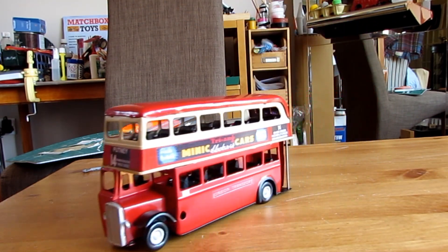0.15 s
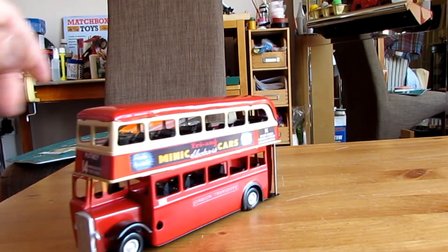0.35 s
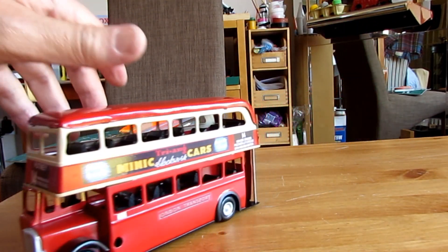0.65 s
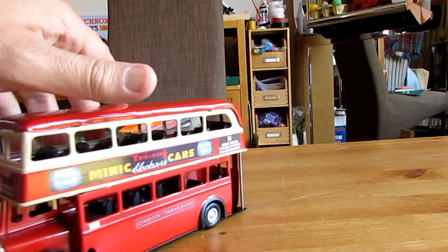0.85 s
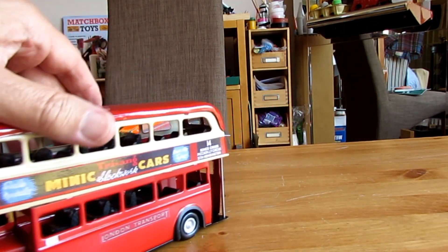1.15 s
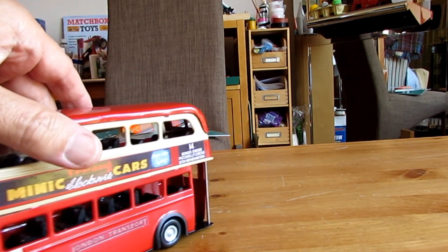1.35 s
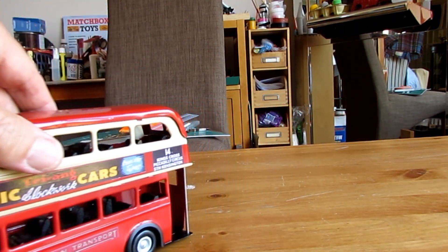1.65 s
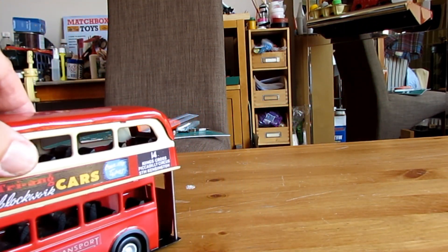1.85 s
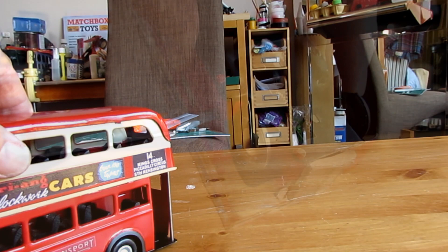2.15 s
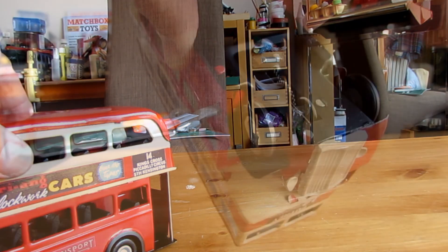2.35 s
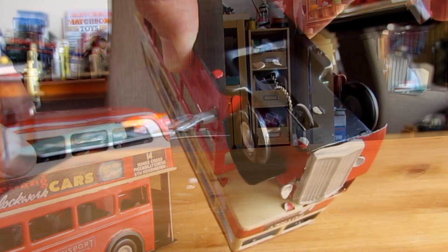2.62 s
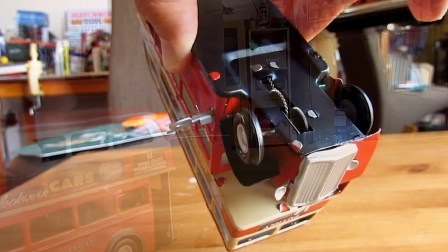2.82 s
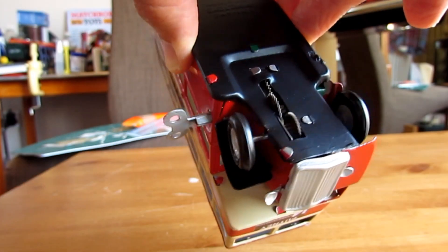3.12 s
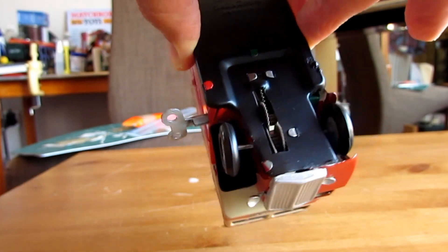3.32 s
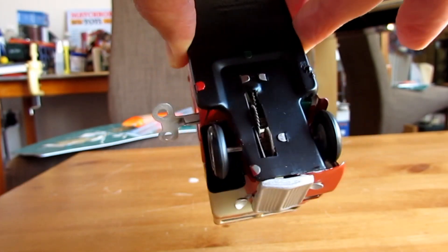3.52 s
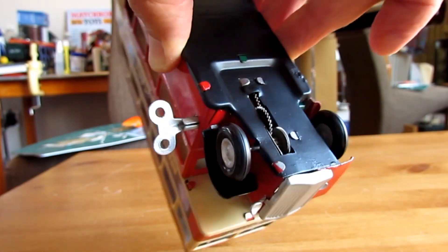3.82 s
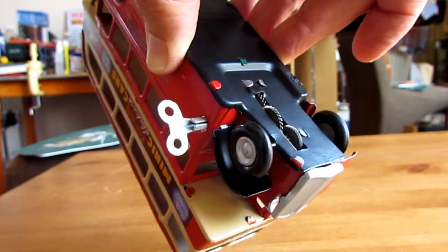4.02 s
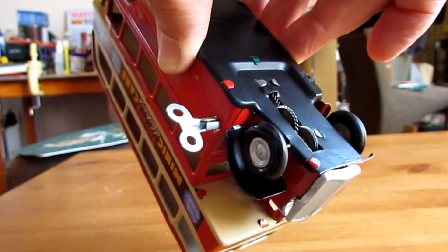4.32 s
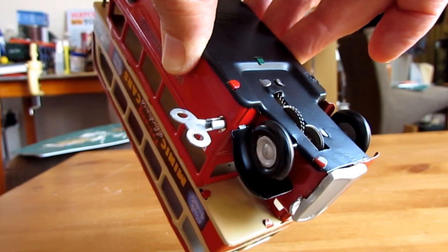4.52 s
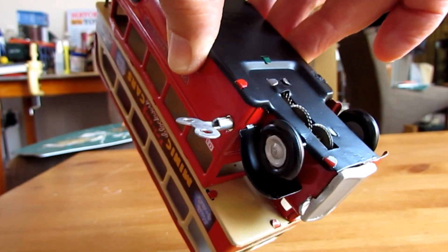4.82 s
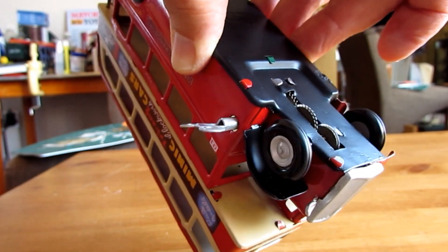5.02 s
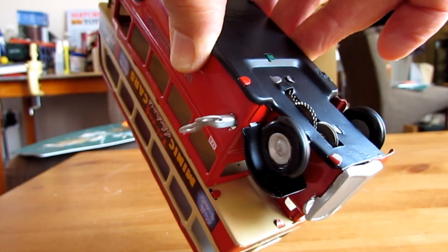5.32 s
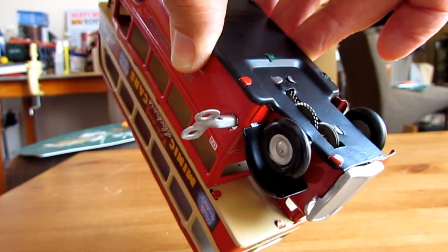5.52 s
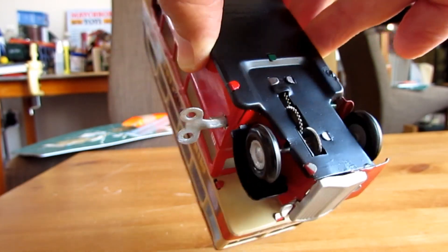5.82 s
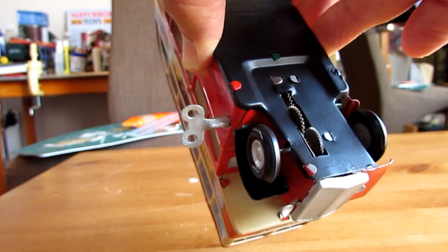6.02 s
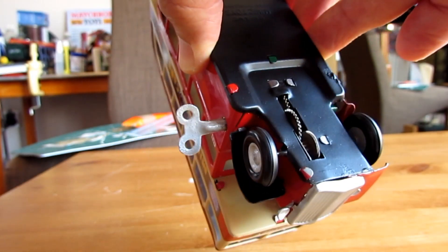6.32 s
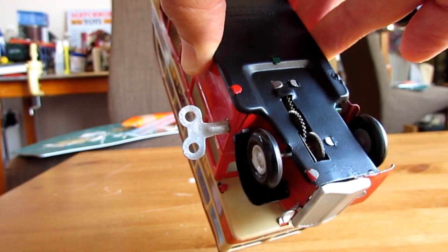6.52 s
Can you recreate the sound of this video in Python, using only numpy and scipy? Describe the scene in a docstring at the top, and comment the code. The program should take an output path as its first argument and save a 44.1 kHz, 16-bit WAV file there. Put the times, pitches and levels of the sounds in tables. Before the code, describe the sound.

Loose tin panels chatter and clink as a toy rolls on wood; after a near-silent gap, a wound spring motor buzzes with gritty ticking gears.

```python
"""Clockwork tin bus

A tin toy bus rolls slowly over a wooden table, its loose panels chattering, until a hand stops it.
Then it is held up close with its wheels in the air: gears and governor ring the tin shell, and slow down unevenly.
Random tiny blows are passed through bodies with many resonances; sines and shaped noise add the drone,
pings, clicks and finger bumps. A low rumble and the faint hush of a room lie behind and fade away."""
import sys
import numpy as np
from scipy import signal
from scipy.fft import rfft, irfft, next_fast_len
from scipy.io import wavfile
from scipy.ndimage import map_coordinates

SR = 44100
rng = np.random.default_rng(int(sys.argv[2]) if len(sys.argv) > 2 else 0)


def pcm_store(signal):
    """Save signal as 16-bit PCM."""
    levels = np.round(np.clip(np.atleast_2d(signal), -1, 1) * 32767)
    wavfile.write(sys.argv[1], SR, levels.astype(np.int16).T)


N = 293706  # length in samples


def amp(db):
    """Turn decibels into gain."""
    return 10 ** (np.asarray(db) / 20)


def unit(x):
    """Scale to an average (rms) level of 1."""
    return x / np.sqrt(np.mean(x ** 2) + 1e-20)


def along(points, hz):
    """Read a curve of (f/Hz, value) points on a logarithmic frequency axis."""
    f, value = np.transpose(points)
    return np.interp(np.log(hz + 1), np.log(f + 1), value)


def curves(rows):
    """Give one value per sample for each column after the time."""
    s, *columns = np.transpose(rows)
    t = np.arange(N) / SR
    return [np.interp(t, s, column) for column in columns]


def wobble(rate):
    """Draw a smooth random curve with `rate` knots a second."""
    knots = rng.standard_normal(int(N * rate / SR) + 4)
    coarse = np.arange(0, N, 64)
    return np.interp(np.arange(N), coarse, map_coordinates(knots, [coarse * rate / SR]))


def filtered(x, response):
    """Weight the frequencies of x by a response."""
    m = next_fast_len(N + SR // 4, real=True)
    spectrum = rfft(x, m) * response(np.fft.rfftfreq(m, 1 / SR))
    return irfft(spectrum, m)[..., :N]


def band(x, lo_hz, hi_hz):
    """Keep x between two soft edges; bands that share an edge add up without a gap."""
    below = lambda f, edge: 1 / (1 + (f / edge) ** 24)
    return filtered(x, lambda f: below(f, hi_hz) - below(f, lo_hz))


def noise(spectrum):
    """Make two unrelated noises of a given colour, each of rms 1."""
    white = rng.standard_normal((2, N))
    return unit(filtered(white, lambda f: amp(along(spectrum, f))))


def stereo(pair, width):
    """Turn mid (centre) and side (difference) into left and right."""
    mid, side = filtered(pair, lambda f: np.array([np.ones_like(f), amp(along(width, f))]))
    return np.array([mid + side, mid - side])


def damped(hz, t60):
    """Make one sine that dies by 60 dB in t60 seconds."""
    t = np.arange(SR // 8) / SR
    return np.sin(2 * np.pi * hz * t) * amp(-60 * t / max(t60, .001))


def bursts(rows, rise):
    """Make the outline of (t/s, level/dB, t60/s) bursts that swell quickly and die away."""
    power, t = np.zeros(N + SR), np.arange(SR // 2) / SR
    for s, db, t60 in rows:
        swell = amp(db - 60 * t / max(t60, .005)) * (1 - np.exp(-t / rise))
        power[max(round(s * SR), 0):][:len(t)] += swell ** 2
    return np.sqrt(power[:N])


def add(out, s, sound):
    """Mix a sound into out at time s."""
    part = out[..., max(round(s * SR), 0):][..., :sound.shape[-1]]
    part += sound[..., :part.shape[-1]]


def impacts(per_second, scatter_db):
    """Scatter tiny blows of uneven size and random direction."""
    hit = rng.random(N) < per_second / SR
    return hit * amp(scatter_db * rng.standard_normal(N)) * rng.choice([-1, 1], N)


def radiate(blows, spread_t60, room_db, room_t60, drift=1.0, rise=0.00068, count=14):
    """Blows at several contact points each take their own paths through tin and room; gives mid, side."""
    t = np.arange(SR // 5) / SR
    at = np.flatnonzero(blows)
    # the parts shift in their play, so the favoured contact points, and the colour, keep changing
    favour = np.array([wobble(7)[at] for _ in range(count)])
    tin, room = rng.standard_normal((2, count, 2, len(t)))
    point = np.full(N, -1)
    point[at] = np.argmax(drift * favour + rng.gumbel(size=(len(at), count)).T, axis=0)
    direct = tin * amp(-60 * t / spread_t60) * (1 - np.exp(-t / rise))
    out = np.zeros((2, N))
    for k in range(count):
        echoes = unit(room[k] * amp(-60 * t / room_t60))
        paths = unit(direct[k]) + amp(room_db) * echoes
        blows_here = np.float32(blows * (point == k))
        out += signal.oaconvolve(blows_here[None], np.float32(paths), axes=1)[:, :N]
    # long waves move the whole body alike, wherever the blow lands
    whole_body = blows * np.sqrt(len(t) * (1 + amp(room_db) ** 2))
    out[0] += band(whole_body - out[0], 20, 900)
    return out


def body(colour, modes, size):
    """Give the answer to one blow of a body with a broad colour and resonances that ring on."""
    f = np.fft.rfftfreq(size, 1 / SR)
    hz, width, db = np.transpose(modes)[:, :, None]
    peaks = np.sum(amp(db) ** 2 / (1 + (2 * (f - hz) / width) ** 2), axis=0)
    # folding the cepstrum makes the sound start at the blow, never before it (minimum phase)
    cepstrum = irfft(np.log(amp(along(colour, f)) * np.sqrt(1 + peaks)))
    cepstrum[1:size // 2] *= 2
    cepstrum[size // 2 + 1:] = 0
    return irfft(np.exp(rfft(cepstrum)))


def ring(x, colour, modes):
    """Pass x through a body whose resonances stay as they are."""
    return signal.oaconvolve(x, body(colour, modes, size=8192)[None], axes=1)[:, :N]


def flexing(x, colour, modes_at, wander, fade_db, rate, size=4096):
    """Pass x through thin tin that flexes: each resonance drifts and fades on its own, the low ones least."""
    modes = modes_at(0)
    knots = rng.standard_normal((int(rate * N / SR) + 2, 2, len(modes)))
    give = modes[:, 0] / (modes[:, 0] + 1500)
    window, out = signal.get_window("hann", size), np.zeros((2, N + 3 * size))
    x = np.pad(x, ((0, 0), (size // 2, size)))
    # overlapping short stretches, each with its own state of the tin
    for at in range(0, N, size // 2):
        k, part = divmod(rate * at / SR, 1)
        old, new = knots[int(k)], knots[int(k) + 1]
        bend, fade = give * (np.cos(part * np.pi / 2) * old + np.sin(part * np.pi / 2) * new)
        hz, width, db = modes_at(at / SR).T
        bent_modes = np.c_[hz * np.exp(wander * bend), width, db + fade_db * fade]
        response = unit(body(colour, bent_modes, size))
        stretch = x[:, at:at + size] * window
        out[:, at:at + 2 * size] += irfft(rfft(stretch, 2 * size) * rfft(response, 2 * size))
    return unit(out[:, size // 2:][:, :N])


# resonances of the chassis standing on the table: (f/Hz, width/Hz, mean level/dB over the broad colour)
CHASSIS_MODES = [(420, 30, 5.5), (473, 16, 3.5), (689.4, 12, 18), (731.6, 8.4, 20), (930, 16, 8.5),
                 (1090, 12, 8), (1880, 55, 5.5), (2380, 49, 7), (2680, 18, 7.5), (3160, 90, 3.5),
                 (3350, 84, 6.5), (4010, 39, 5), (4320, 54, 5), (4850, 89, -2), (5640, 150, -8),
                 (6500, 170, -6), (7270, 190, 3.5), (10100, 260, 4)]
# broad colour of the rolling rattle: (f/Hz, relative level/dB)
RATTLE_COLOUR = [(40, -2), (200, -13), (450, -7), (900, -5), (1400, -9), (3200, -6.5), (6800, -1.5),
                 (8300, 1), (10500, 0), (13000, -1), (15600, -12)]


def chatter(per_second, scatter_db):
    """Loose panels tap on the standing chassis and make its resonances ring, at rms 1."""
    blows = impacts(per_second, scatter_db)
    taps = radiate(blows, spread_t60=0.017, room_db=-4.5, room_t60=0.32, drift=1.1, count=8)
    return flexing(taps, RATTLE_COLOUR, lambda s: np.array(CHASSIS_MODES), wander=.01, fade_db=3, rate=16)


# a loose part pings as it is shaken, rising in pitch as the bus is gripped: (t/s, middle f/Hz)
PING_PITCH = [(0, 6000), (1.0, 6600), (1.25, 7070), (2.2, 7640), (3.4, 8030), (5.2, 8260), (6.66, 9000)]


def pings(force_db, per_second, t60, scatter_db, detune=0.024):
    """A loose part rings briefly at each shake, a little differently every time; gives mid and side."""
    pitch_hz, = curves(PING_PITCH)
    shakes = impacts(per_second, scatter_db) * amp(force_db)
    at, t = np.flatnonzero(shakes), np.arange(512) / SR
    chance = rng.standard_normal((len(at), 2))  # for pitch and for place
    hz = pitch_hz[at] * np.exp(detune * chance[:, 0])
    outline = amp(-60 * t / t60) * (1 - np.exp(-t / 0.000085))
    rings = shakes[at, None] * np.sin(2 * np.pi * hz[:, None] * t) * outline
    index = (at[:, None] + np.arange(len(t))).ravel()
    pair = [np.bincount(index, r.ravel(), N)[:N] for r in (rings, rings * chance[:, 1:])]
    return unit(np.array(pair))


# the bus rolls, is held back and comes to rest: (t/s, rattle level/dB, drone level/dB), before trims
ROLL = [(0.0, -30.5, -39), (.15, -35, -42), (.22, -32, -40.5), (.5, -36, -42.5), (1.15, -41.5, -45.5),
        (1.65, -41.5, -47), (1.72, -44.5, -52), (1.88, -44, -54), (1.97, -46.5, -60), (2.025, -51, -62),
        (2.1, -55.5, -62), (2.3, -61.5, -94)]
# jolts set loose panels chattering and ring the hollow body, before trims:
# (t/s, chatter level/dB, chatter t60/s, body ring level/dB)
JOLTS = [(0.0, -20, .1, -25), (0.047, -18, 0.36, -29), (0.168, -12.5, 0.12, -27), (0.195, -19.5, 0.23, -44),
         (0.24, -18, 0.15, -25), (0.355, -37, .1, -25), (0.392, -16.5, 0.19, -27), (0.409, -23, 0.11, -36),
         (0.458, -12, 0.18, -16), (0.508, -30, .08, -23), (0.57, -24.5, 0.31, -23),
         (0.629, -17.5, 0.2, -37), (0.697, -24, 0.23, -24), (0.724, -21.5, 0.37, -25),
         (0.773, -23.5, .15, -40), (0.822, -19.5, 0.091, -23), (0.885, -20.5, 0.3, -21.5),
         (0.963, -21.5, 0.23, -40), (0.997, -17, 0.12, -23), (1.059, -24.5, 0.23, -38),
         (1.118, -21, 0.082, -28), (1.194, -22.5, 0.15, -23), (1.241, -23, 0.13, -23.5),
         (1.276, -20.5, 0.26, -34), (1.338, -22, 0.37, -28), (1.368, -25, 0.3, -31),
         (1.496, -17.5, 0.28, -39), (1.554, -22, 0.38, -26.5), (1.586, -19.5, 0.3, -36),
         (1.641, -16.5, 0.082, -26), (1.705, -33, .18, -52), (1.7545, -26, 0.23, -46),
         (1.804, -23.5, 0.22, -36), (1.834, -20.5, 0.13, -33), (2.058, -26, 0.19, -57)]
# stereo width of the bus on the table: (f/Hz, side-to-mid level/dB)
FAR_WIDTH = [(200, -7), (380, -10), (700, -23), (1290, -8), (2380, -96), (4400, -15), (8120, -6.5),
             (15000, -1)]
BODY_HZ, BODY_WANDER_HZ = 724, 7.1  # main mode of the hollow body
BODY_T60_S, BODY_RISE_S = 0.097, 0.01
JOLT_RISE_S = 0.0041  # every flurry swells alike
TOP_DB, TOP_GROWS = -6.5, 1.22  # top end against rattle_db at full roll; its dB per dB of rattle


def rolling():
    """The wheels make the hollow body drone and rattle; each jolt adds a flurry of taps and swells the drone."""
    rattle_db, drone_db = curves(ROLL)
    taps = chatter(per_second=900, scatter_db=2.5)

    # the main body mode stands out of a softer hollow rumble
    hum = unit(band(taps, 645, 880))
    hollow = unit(band(taps, 353, 650) + amp(-4) * band(taps, 770, 1120))
    mode_hz = BODY_HZ + BODY_WANDER_HZ * wobble(40.04)
    mode = np.sin(2 * np.pi * np.cumsum(mode_hz) / SR)
    body_jolts = [(s, ring_db, BODY_T60_S) for s, db, t60, ring_db in JOLTS]
    body_ring = mode * bursts(body_jolts, BODY_RISE_S)
    drone = amp(-2.0) * body_ring + amp(drone_db) * (amp(-3.5) * hum + amp(-4) * hollow)

    loose = amp(-12.5) * pings(0, per_second=570, t60=0.008, scatter_db=3, detune=0.03)
    # louder rolling is brighter
    top_db = rattle_db.max() + TOP_DB + TOP_GROWS * (rattle_db - rattle_db.max())
    rattle = amp(rattle_db - 2.5) * (unit(band(taps, 1020, 6700)) + loose)
    rattle = rattle + amp(top_db) * unit(band(taps, 7100, 16500))

    # the hand on the roof dulls the top end of the flurries as it takes hold
    held_db, = curves([(.4, -6.5), (1.1, -8), (1.7, -11)])
    flurry = chatter(per_second=1900, scatter_db=3.5)
    flurry = band(flurry, 860, 7020) + amp(held_db) * band(flurry, 7400, 19000) + amp(-3.0) * loose
    jolts = bursts([(s, db, t60) for s, db, t60, ring_db in JOLTS], JOLT_RISE_S)
    return stereo(drone + rattle + amp(-5.0) * jolts * flurry, FAR_WIDTH)


# low background rumble, falling slowly, then dropping away near 4.5 s: (t/s, level/dB before a trim)
RUMBLE_LEVEL = [(0.05, -43), (.6, -46), (2.15, -49.5), (2.6, -53.5), (4.4, -58.5), (4.55, -78)]
# colour of the rumble: (f/Hz, relative level/dB per Hz)
RUMBLE_COLOUR = [(15, -48), (25, -27), (80, -4.5), (183, -2), (274, -8.5), (361, -5.5), (399, -11.5),
                 (500, -13), (650, -15.5), (1100, -120)]
# stereo width of the rumble, the bass nearly mono: (f/Hz, side-to-mid level/dB)
RUMBLE_WIDTH = [(60, -25), (130, -23), (300, -4), (600, 7.5)]
# fingers bump the body: (t/s, level/dB, centre f/Hz, t60/s)
BUMPS = [(2.114, -47, 330, 0.16), (3.155, -38.5, 300, 0.2), (4.35, -43.5, 260, 0.34),
         (4.41, -41, 300, 0.22)]


def rumble_and_bumps():
    """Soft finger bumps, short swells of low noise, over a low rumble of noise that gradually fades away."""
    out = stereo(amp(curves(RUMBLE_LEVEL)[0] - 5.0) * noise(RUMBLE_COLOUR), RUMBLE_WIDTH)
    for s, db, hz, t60 in BUMPS:
        thud = noise([(hz / 8, -25), (hz / 2, -4), (hz, 0), (hz * 3.7, -4), (hz * 4, -35)])[0]
        out += bursts([(s, db, t60)], rise=0.0036) * thud
    return out


# colour of the room's hush: (f/Hz, relative level/dB per Hz)
AIR_COLOUR = [(150, -10), (250, -2.5), (292, -4), (359, -22), (583, -0.5), (8770, -56), (14700, -25),
              (15500, -31)]


def room_air():
    """Faint hush of the room, noise unrelated left and right, fading out between 2.3 and 2.9 s."""
    level_db, = curves([(2.3, -54.5), (2.9, -86)])
    return amp(level_db) * noise(AIR_COLOUR)


# sharp clicks of tin on tin: (t/s, level/dB before trims, ring f/Hz, ring t60/s)
CLICKS = [(0.1705, -28, 6130, 0.021), (1.061, -18.5, 6300, .02), (1.28, -15, 7030, .03),
          (1.340, -10.5, 6970, 0.014), (1.497, -20.5, 6200, 0.17), (1.511, -18, 6300, 0.04),
          (1.587, -20, 7100, .03), (1.756, -20, 7400, 0.042)]
# the body is pressed down and stops with a dull tock: (t/s, level/dB, f/Hz, t60/s)
STOP = (2.1115, -31, 480, .013)


def clicks():
    """Single contacts: a short crack and the ring of a small panel; last, the dull tock of stopping."""
    tones = np.zeros((2, N))
    for s, db, hz, t60 in CLICKS:
        # three close modes beat against each other
        for ratio in (.97, 1, 1.035):
            tone = amp(db - 12.5) * damped(hz * ratio, t60)
            add(tones, s, tone * rng.choice([-1, 1], (2, 1)))
    stop_s, stop_db, stop_hz, stop_t60 = STOP
    middle_only = np.array([[1], [0]])
    add(tones, stop_s, amp(stop_db) * damped(stop_hz, stop_t60) * middle_only)
    cracks = bursts([(s, db, .016) for s, db, hz, t60 in CLICKS], rise=0.00027)
    tin = ring(rng.standard_normal((2, N)), RATTLE_COLOUR, CHASSIS_MODES)
    tin = unit(band(tin, 1900, 16500))
    return stereo(tones + amp(-14) * cracks * tin, FAR_WIDTH)


# the bus is turned in the hand while the fingers shift, damping some panels and freeing others:
# (t/s, turn, grip), both without unit
HOLD = [(2.55, -2.1, 0.29), (2.85, -1.9, -0.15), (3.17, -1.8, -0.5), (3.27, -0.73, -0.93),
        (3.6, -0.72, 0.38), (3.85, 0.06, -1.3), (4.3, 0.4, -0.88), (4.72, -0.039, -0.71),
        (4.95, -0.26, 1.3), (5.3, -0.0067, 0.59), (5.68, -0.3, 1.1), (5.85, 1.3, 0.41), (6.2, 1.6, 0.17),
        (6.66, 1.3, 0.23)]
# resonances of the tin shell, driven by the gears: (f/Hz, width/Hz, level/dB over the broad colour
# at turn 0 and grip 0, level change/dB per unit of turn, level change/dB per unit of grip)
SHELL_MODES = [(528, 17.5, 11, 3.5, 2.5), (576.3, 6.9, 22.5, 0.1, 0.1), (658, 22, 15, -0.5, 0.5),
               (703.3, 7.6, 21.5, -1, 2), (741.4, 13, 17.5, 3.5, -0.5), (909, 90, 11.5, 0.5, -1),
               (1061, 26, 11, 0, -2.5), (1310, 160, 0, 1, 3), (1803, 62, 11.5, -0.5, 3.5),
               (1908, 61, 12, 0.5, 5), (2170, 120, 4, 2.5, 2), (2294, 45, 13, 0.5, 0),
               (2380, 19, 13.5, -1.5, -3.5), (2647, 250, 9, 0.5, 0), (2923, 60, 15.5, -1.7, -1.5),
               (3046, 130, 13.5, -1.4, -3), (3170, 45, 12.5, 1, -2), (3350, 49, 14, -1.2, -3),
               (3580, 104, 12, -1, -3.5), (3920, 220, 11, -0.5, -0.5), (4326, 36, 15, 1.5, 0.5),
               (4500, 140, 9.5, -1.6, 1.5), (4850, 120, 12.5, 1.2, 2), (5050, 130, 7, 0, 2),
               (5340, 220, 8, 2, -2), (5580, 26, 14, -2, 3), (5880, 140, 12.5, -1.5, -1.5),
               (6260, 200, 9, -2, 0.5), (6600, 190, 7.5, -3, 2), (6920, 100, 11, -1.8, -4.5),
               (7260, 91, 13, 1.7, -2), (7560, 140, 2, -6, -6.5), (7950, 510, 10, 2, 1),
               (8570, 270, 11.5, 0, 0), (8860, 87, 12, -2, -4), (9320, 260, 9, 2.5, 0.5),
               (9620, 230, 5.5, -4.5, -0.5), (10400, 720, 8.5, -1, 0), (11850, 700, 2, 4, -1.5),
               (12660, 520, 2.5, -3.5, -0.5), (13800, 1100, 4, 0, 2)]


def held_shell(s):
    """Give the shell's resonances at time s: turning and gripping make each one louder or softer."""
    times, *controls = np.transpose(HOLD)
    turn, grip = [np.interp(s, times, c) for c in controls]
    hz, width, db, turn_db, grip_db = np.transpose(SHELL_MODES)
    return np.c_[hz, width, db + turn * turn_db + grip * grip_db]


# broad colour of a gear impact: (f/Hz, relative level/dB)
TOOTH_COLOUR = [(40, -50.5), (200, -26.5), (420, -22.5), (560, -21.5), (1500, -12), (2400, -13),
                (5300, -12), (8500, -13), (11000, -11), (14000, -12), (15600, -10.5)]
# the mechanism lets go with one thin tick: (t/s, level/dB, t60/s)
RELEASE = [(2.333, -22.5, .014)]
# hard knocks of the gear play, which clack in the side panels and tick in the frame:
# (t/s, clack level/dB, tick level/dB)
KNOCKS = [(2.795, -22, -25), (2.892, -16, -24), (2.927, -31, -14), (2.981, -17, -19), (3.036, -22, -20),
          (3.08, -13.5, -20), (3.089, -22, -16.5), (3.1314, -25, -11.5), (3.179, -14.5, -12),
          (3.385, -20.5, -26), (3.44, -30, -14), (3.484, -17.5, -15), (3.628, -17, -22),
          (3.682, -20, -12.5), (3.735, -18, -15), (3.89, -15, -21), (3.926, -24, -19), (3.938, -18, -14),
          (4.1416, -18.5, -19), (4.212, -13.5, -19), (4.25, -16, -16), (4.309, -27, -14), (4.532, -17, -15),
          (4.693, -19, -21), (4.708, -18, -16), (4.757, -21, -19), (4.8095, -22, -16), (4.939, -19, -17.5),
          (5.113, -20, -15), (5.1888, -20, -17), (5.455, -18, -13), (5.567, -25, -16), (5.763, -25, -15),
          (5.942, -23, -21), (6.012, -20, -22), (6.268, -22, -19), (6.575, -21.5, -30)]
KNOCK_T60_S = 0.038


def knocks():
    """Play in the gears: hard contacts with a short rebound clack low and tick high; gives mid and side."""
    blows = impacts(per_second=4000, scatter_db=1.5)
    rebound = radiate(blows, spread_t60=0.002, room_db=-18, room_t60=0.068, count=6)
    tin = ring(rebound, TOOTH_COLOUR, np.array(SHELL_MODES)[:, :3])
    clack_rows = [(s, clack_db, KNOCK_T60_S) for s, clack_db, tick_db in KNOCKS]
    tick_rows = [(s, tick_db, KNOCK_T60_S) for s, clack_db, tick_db in KNOCKS]
    clacks = bursts(clack_rows, rise=0.0026)
    ticks = bursts(tick_rows + RELEASE, rise=0.0027)
    return clacks * unit(band(tin, 2090, 3950)) + ticks * unit(band(tin, 4180, 19600))


# the governor slows, unevenly, as the spring unwinds: (t/s, turns per second)
GOVERNOR_SPEED = [(2.33, 79.07), (2.76, 93.43), (3.06, 91.86), (3.42, 86.11), (3.63, 93.27), (3.8, 91.07),
                  (4.14, 81.58), (4.62, 80.76), (5.02, 74.69), (5.41, 80.14), (5.57, 79.66), (5.79, 68.7),
                  (5.88, 65.1), (6.0, 73.08), (6.22, 70.22), (6.43, 72.79), (6.65, 71.07)]
# the running gears, brought close and then easing off: (t/s, level/dB before the tone changes below)
DRIVE = [(2.345, -45), (2.38, -35.5), (2.45, -28), (2.575, -27), (2.6, -25), (3.08, -19.5), (3.3, -22.5),
         (3.62, -23), (3.92, -20.5), (4.6, -21.5), (4.95, -24), (5.5, -22.5), (5.8, -25), (5.84, -25.5),
         (6.66, -25)]
# gain on the low ring of the shell, 290 to 580 Hz: (t/s, level/dB)
LOW_RING = [(2.55, -4), (2.8, 2), (3.0, 1), (3.4, 6), (3.8, 4), (4.05, -0.5), (5.1, -1.5), (6.0, 1)]
# fingers lie on the side panels and damp them, less so as they slide off: (t/s, mean level/dB)
PANEL_DAMPING = [(2.5, -4), (2.95, -2.3), (4.4, -2.7), (5.5, -2), (6.0, 0)]
# stereo width of the bus held close: (f/Hz, side-to-mid level/dB)
NEAR_WIDTH = [(400, -53), (2800, -100), (4400, -21), (8120, -10.5), (15000, -8.5)]


def motor(governor_db=1.35, axle_db=0.84, edge=0.21, brighten=0.65, clump_db=0.72,
          drive_brightens=0.54, plain_drive_db=-23):
    """Gear teeth clatter without pause, harder once in each turn of the governor and of the wheel axle."""
    running = np.arange(N) / SR > GOVERNOR_SPEED[0][0]
    drive_db, = curves(DRIVE)
    governor = 2 * np.pi * np.cumsum(curves(GOVERNOR_SPEED)[0] * running) / SR
    axle = governor * 2 / 9
    force_db = governor_db * (np.cos(governor) - edge * np.sin(2 * governor)) + axle_db * np.cos(axle)
    # the backlash makes the teeth strike in uneven clumps
    force_db = force_db + clump_db * wobble(70)

    teeth = impacts(per_second=2400, scatter_db=0.5) * amp(force_db)
    mesh = unit(radiate(teeth, spread_t60=.008, room_db=-6, room_t60=.2, drift=.8))
    # single teeth snap home in dry ticks
    snaps = impacts(per_second=260, scatter_db=2) * amp(force_db)
    ticks = unit(radiate(snaps, spread_t60=.005, room_db=-12, room_t60=.15, rise=.0002, count=6))
    gears = flexing(mesh + amp(-4) * ticks, TOOTH_COLOUR, held_shell, wander=0.005, fade_db=2.3, rate=20)

    gears = gears + (amp(curves(LOW_RING)[0]) - 1) * band(gears, 290, 580)
    # the side panels ring more loosely than the frame, in fits
    panel_db = curves(PANEL_DAMPING)[0] + 1.0 * wobble(60)
    gears = gears + (amp(panel_db) - 1) * band(gears, 3000, 4200)
    # harder blows and a stronger drive are brighter
    bright_db = brighten * force_db + drive_brightens * np.maximum(drive_db - plain_drive_db, -3)
    gears = gears + (amp(bright_db) - 1) * band(gears, 10100, 17000)
    gears = gears + amp(-12.5) * pings(force_db, per_second=250, t60=0.0076, scatter_db=2.5)
    return stereo(running * amp(drive_db) * gears + knocks(), NEAR_WIDTH)


def scene():
    """Add up the rolling bus, its clicks, the free-running motor, the finger bumps and the background."""
    return rolling() + clicks() + motor() + rumble_and_bumps() + room_air()


TOP_HZ = 15900


def record(dry):
    """Remove everything from the band limit upwards."""
    return filtered(dry, lambda hz: hz < TOP_HZ)


dry = scene()
out = record(dry)
pcm_store(out)
```